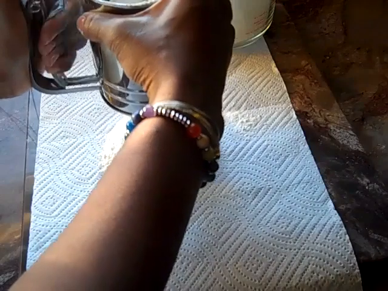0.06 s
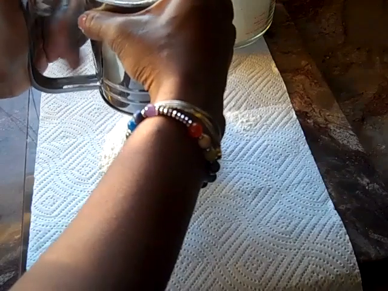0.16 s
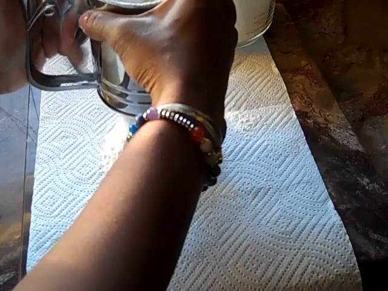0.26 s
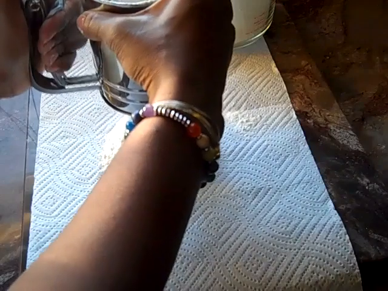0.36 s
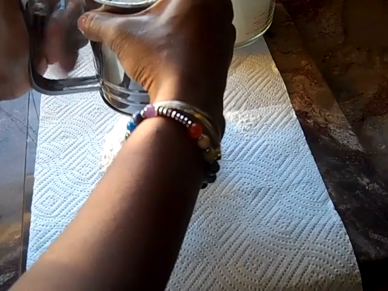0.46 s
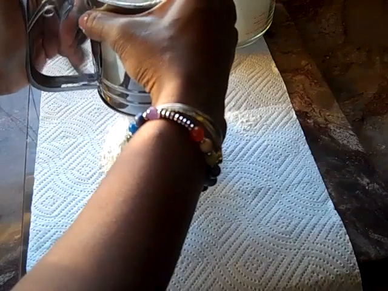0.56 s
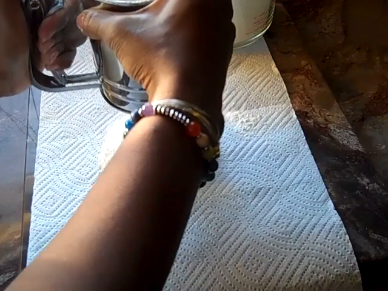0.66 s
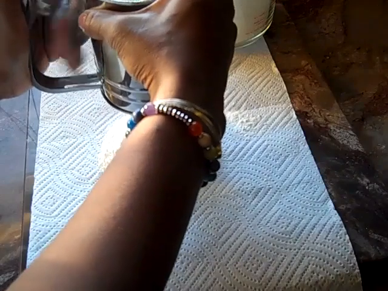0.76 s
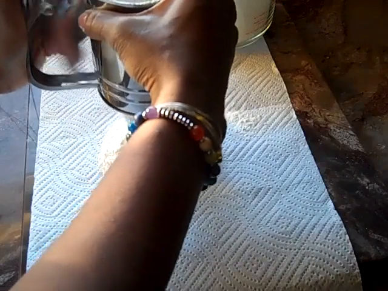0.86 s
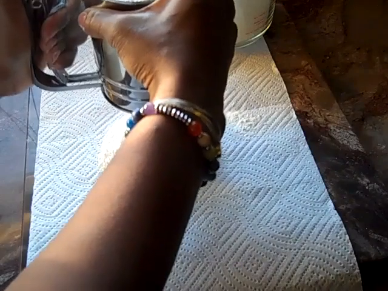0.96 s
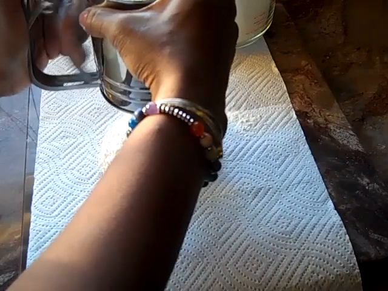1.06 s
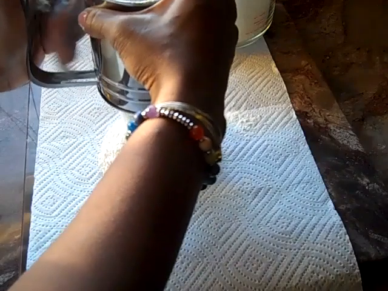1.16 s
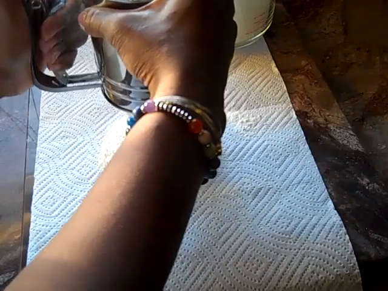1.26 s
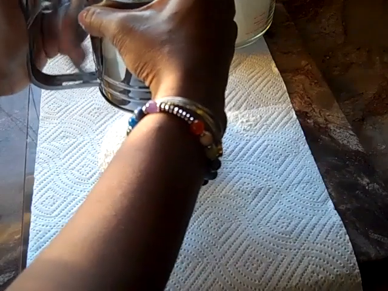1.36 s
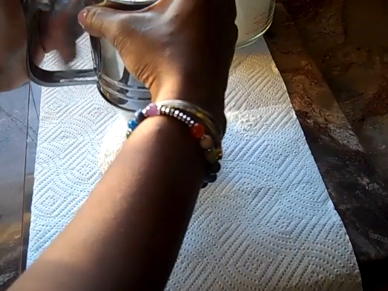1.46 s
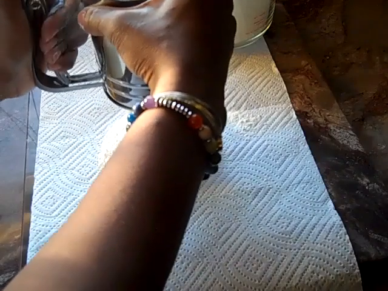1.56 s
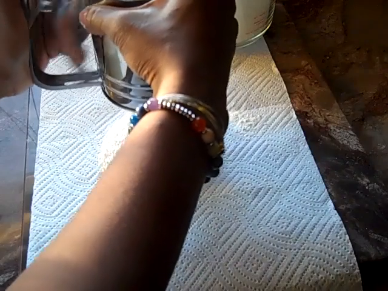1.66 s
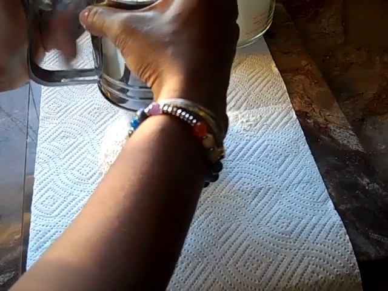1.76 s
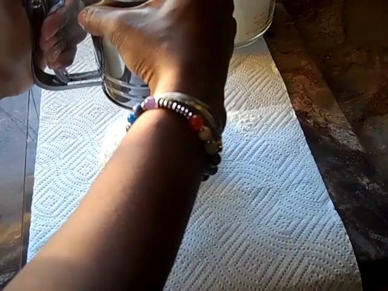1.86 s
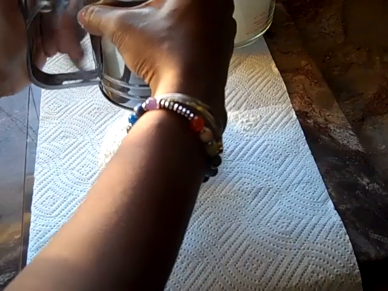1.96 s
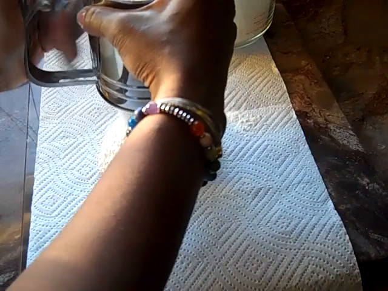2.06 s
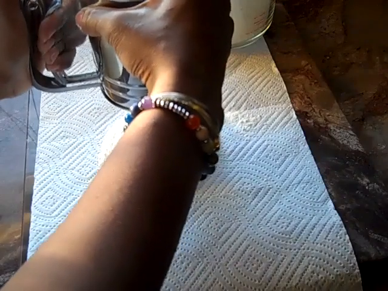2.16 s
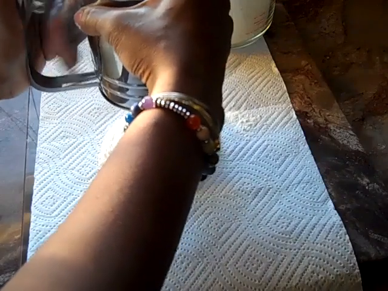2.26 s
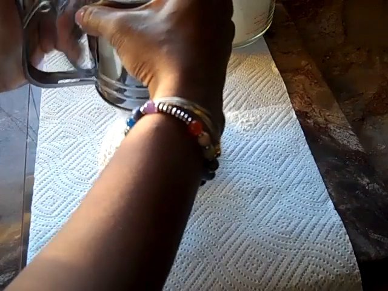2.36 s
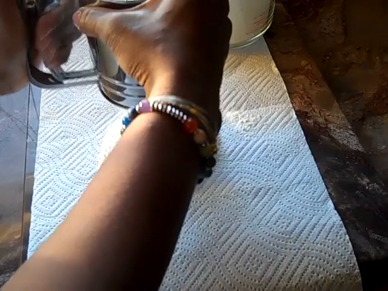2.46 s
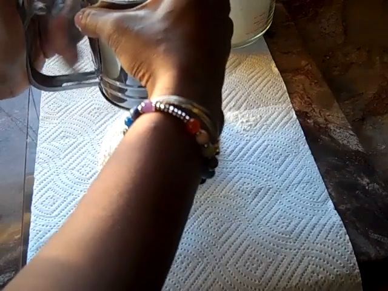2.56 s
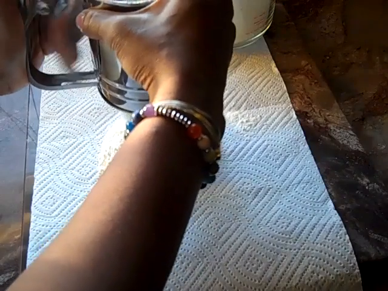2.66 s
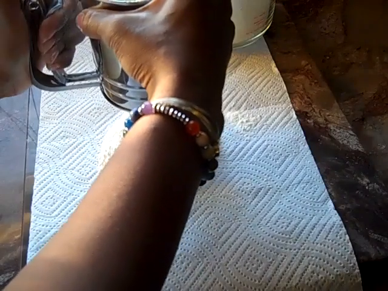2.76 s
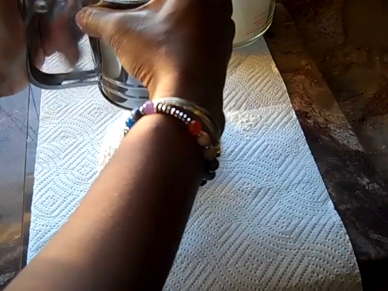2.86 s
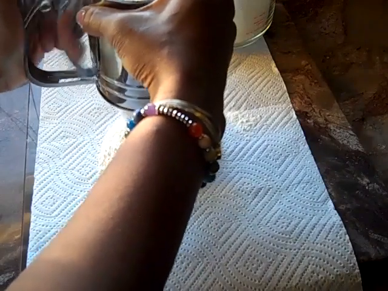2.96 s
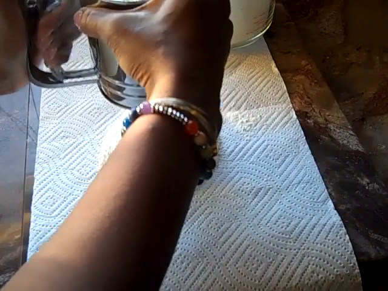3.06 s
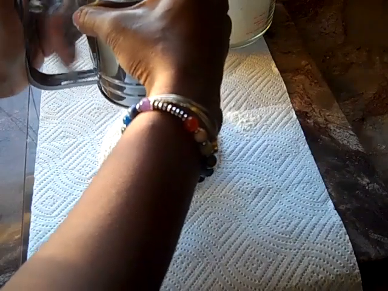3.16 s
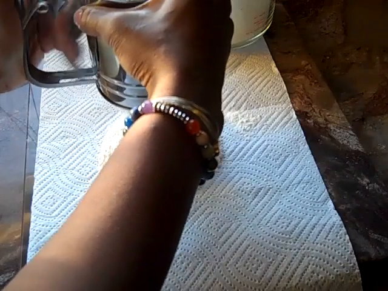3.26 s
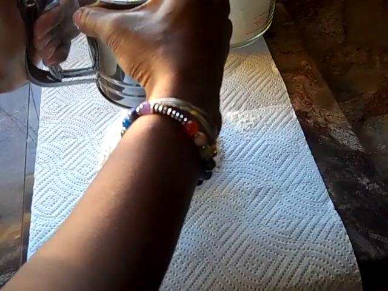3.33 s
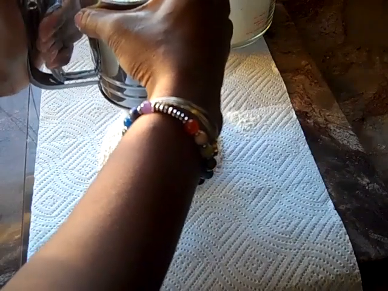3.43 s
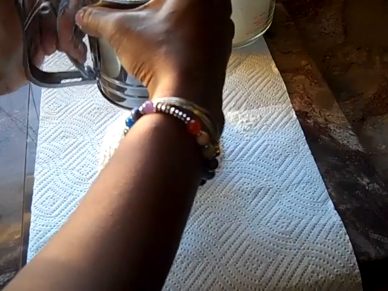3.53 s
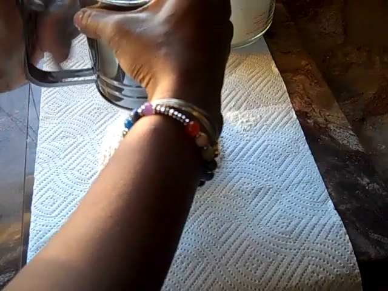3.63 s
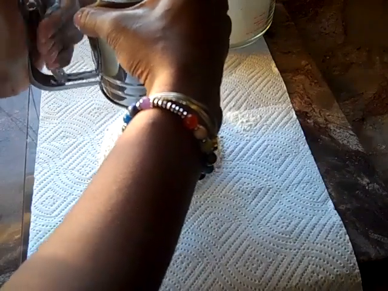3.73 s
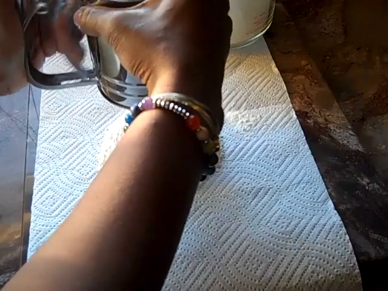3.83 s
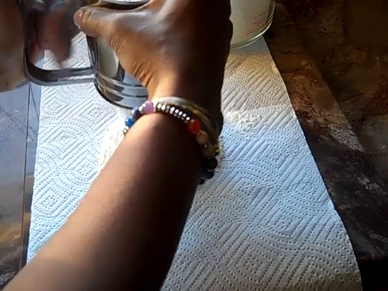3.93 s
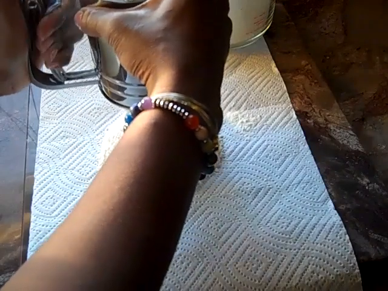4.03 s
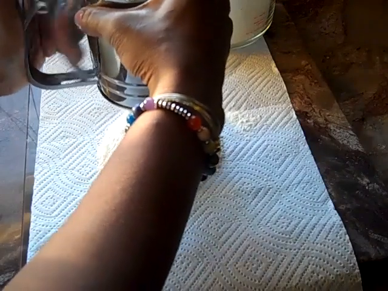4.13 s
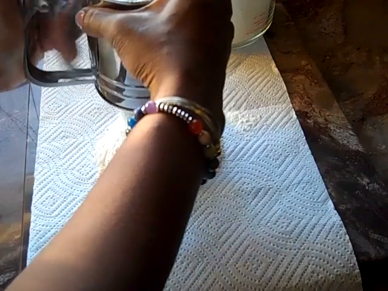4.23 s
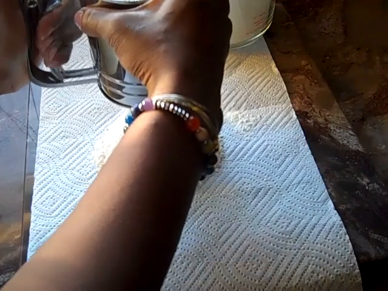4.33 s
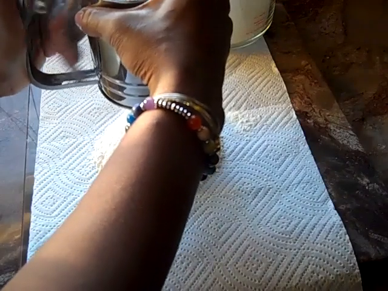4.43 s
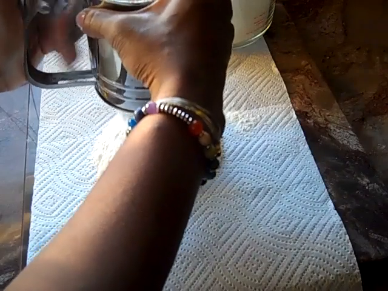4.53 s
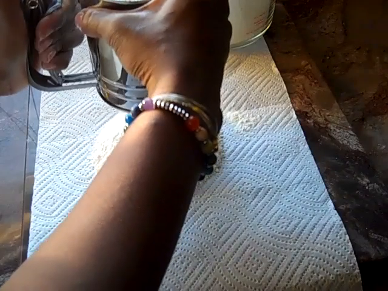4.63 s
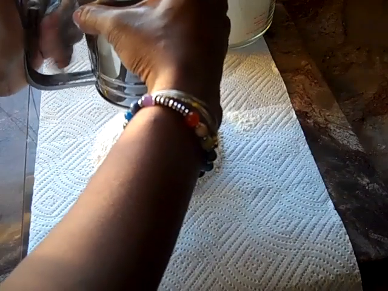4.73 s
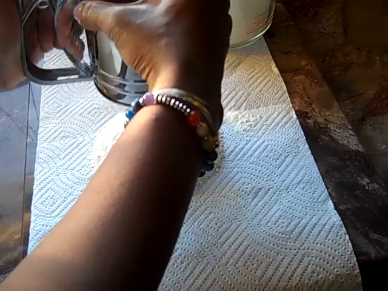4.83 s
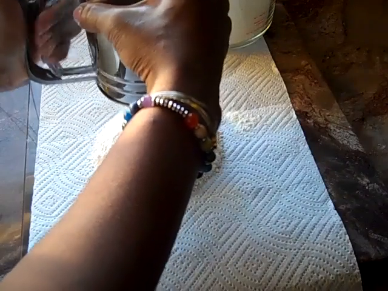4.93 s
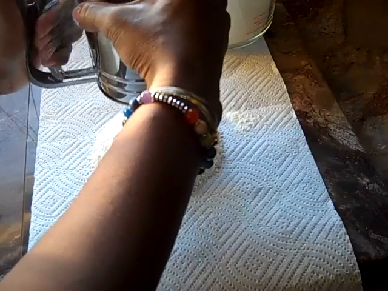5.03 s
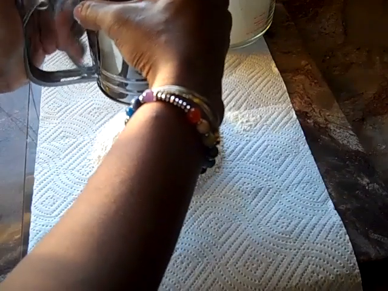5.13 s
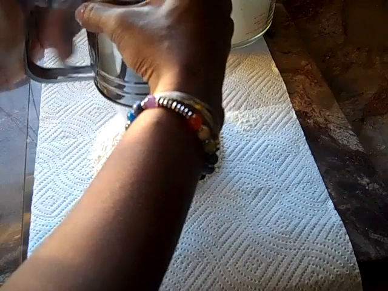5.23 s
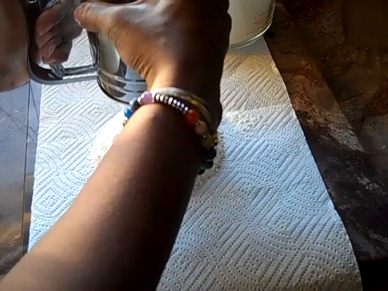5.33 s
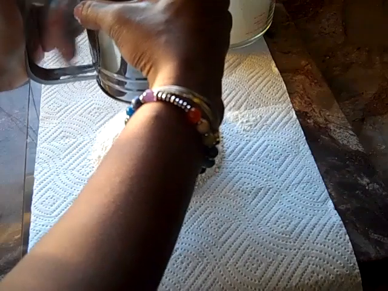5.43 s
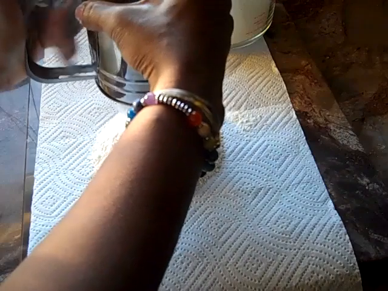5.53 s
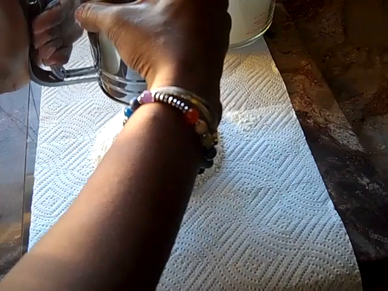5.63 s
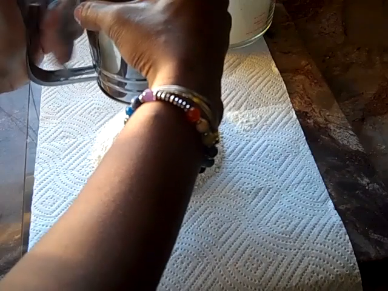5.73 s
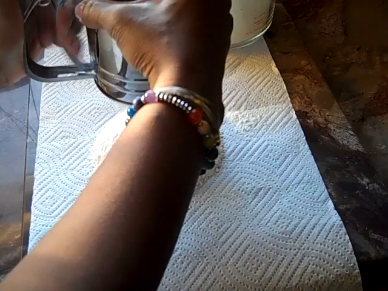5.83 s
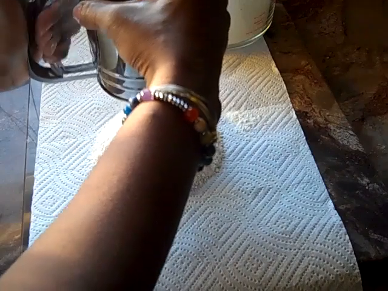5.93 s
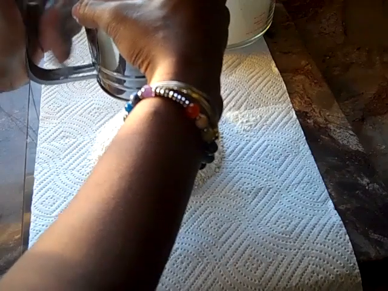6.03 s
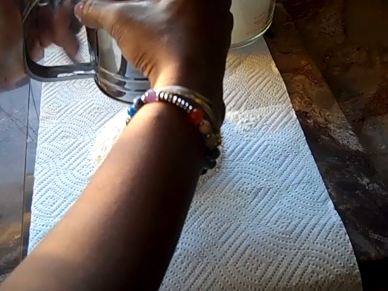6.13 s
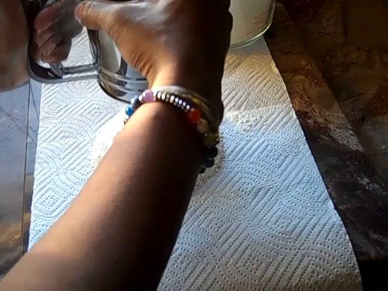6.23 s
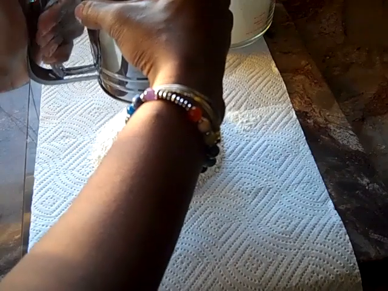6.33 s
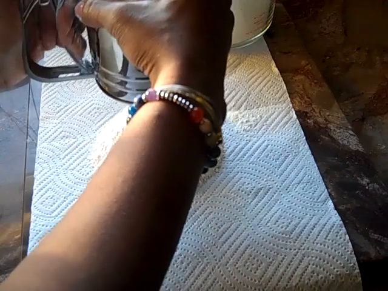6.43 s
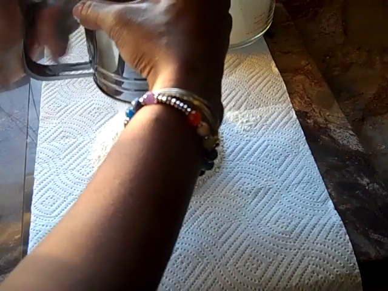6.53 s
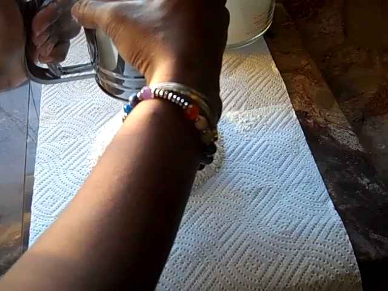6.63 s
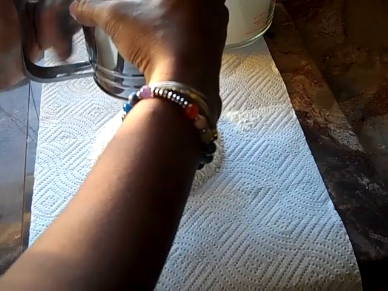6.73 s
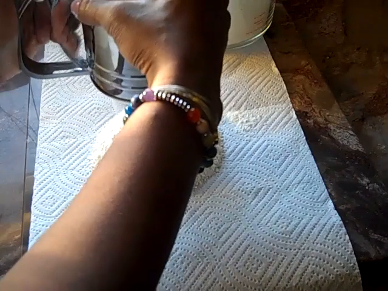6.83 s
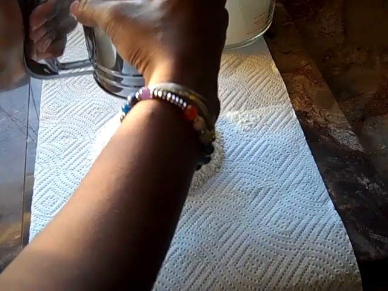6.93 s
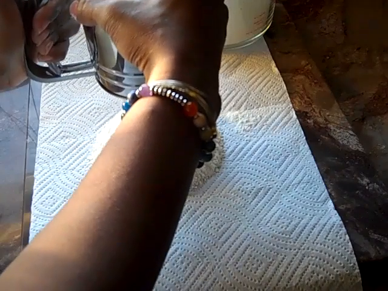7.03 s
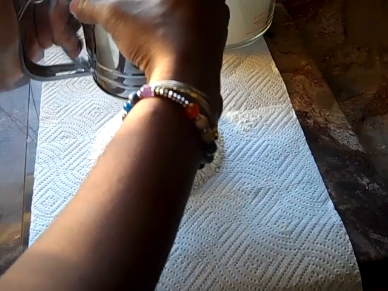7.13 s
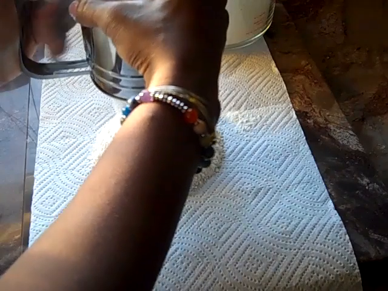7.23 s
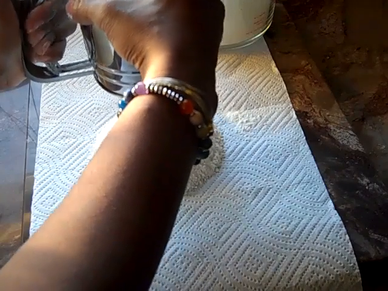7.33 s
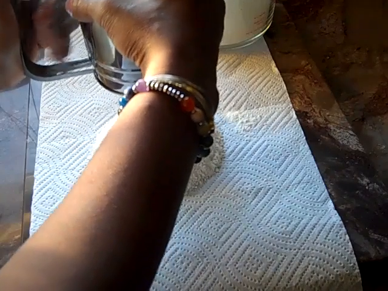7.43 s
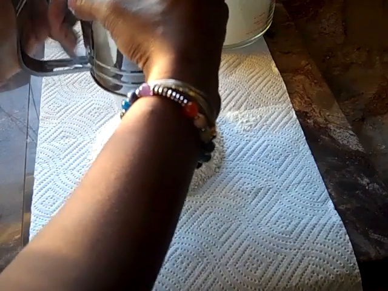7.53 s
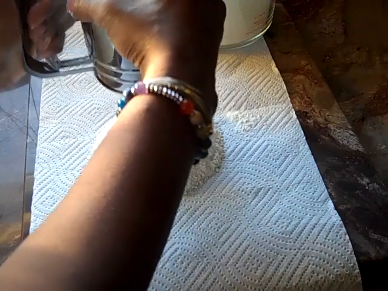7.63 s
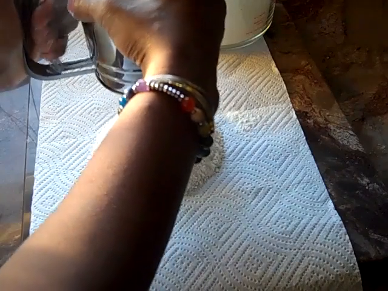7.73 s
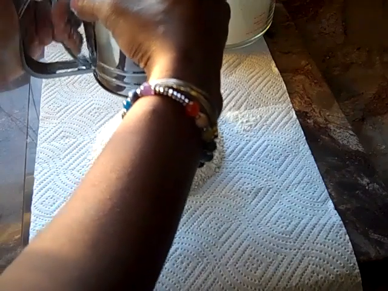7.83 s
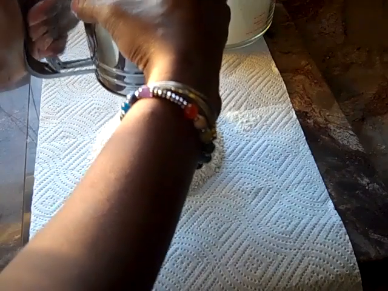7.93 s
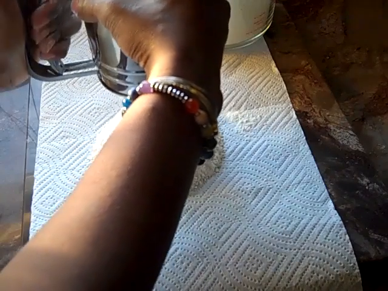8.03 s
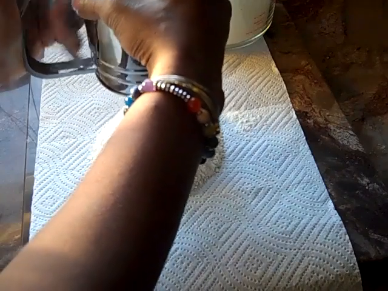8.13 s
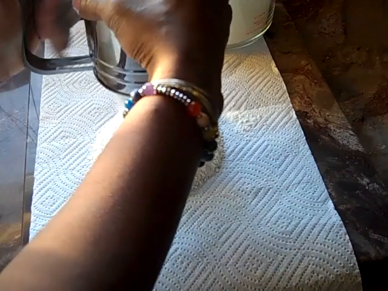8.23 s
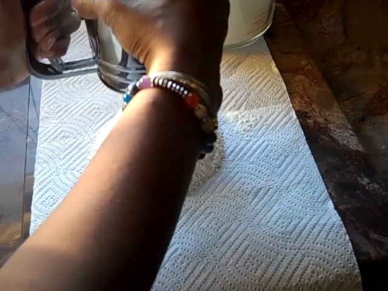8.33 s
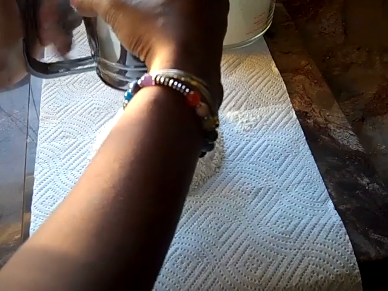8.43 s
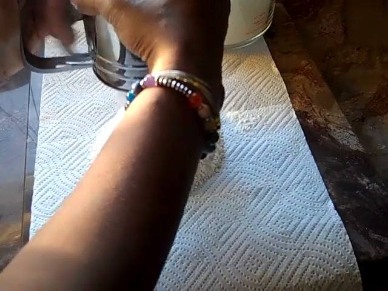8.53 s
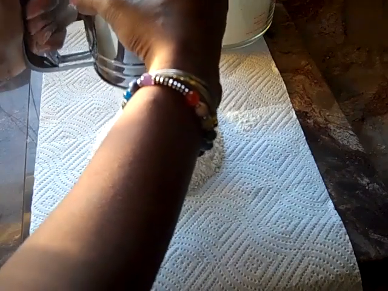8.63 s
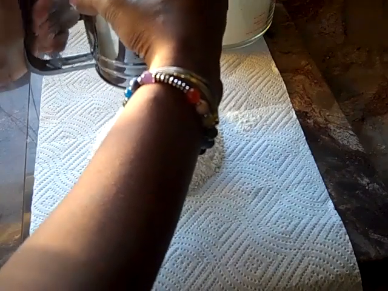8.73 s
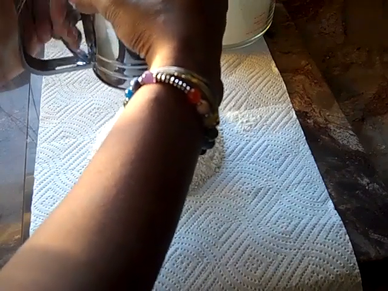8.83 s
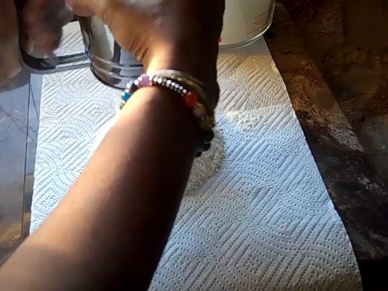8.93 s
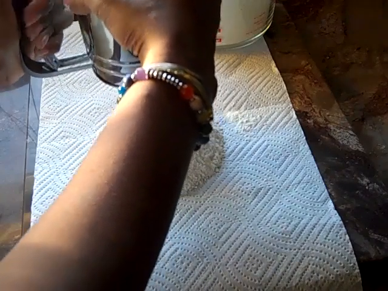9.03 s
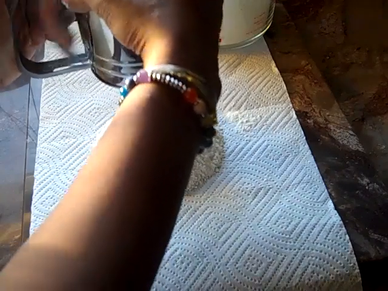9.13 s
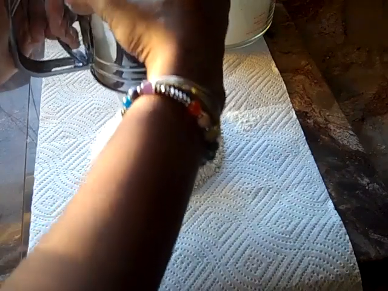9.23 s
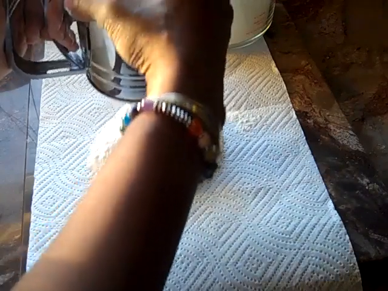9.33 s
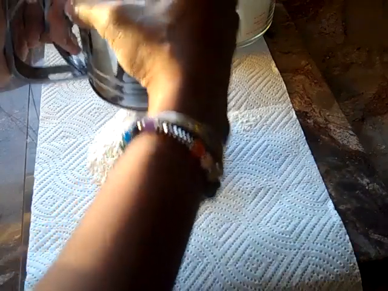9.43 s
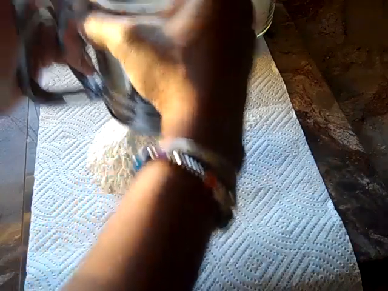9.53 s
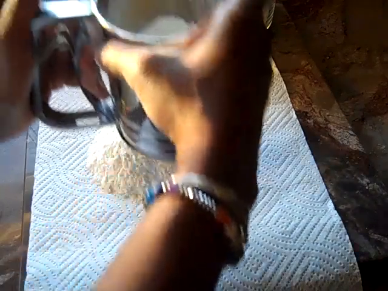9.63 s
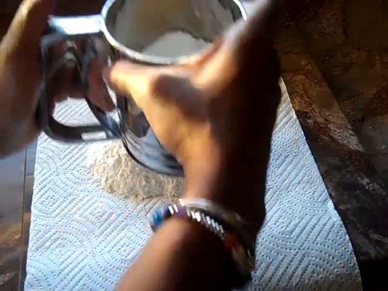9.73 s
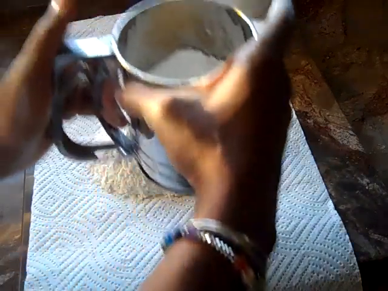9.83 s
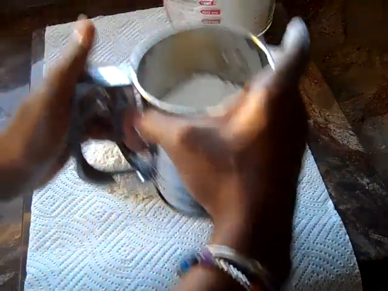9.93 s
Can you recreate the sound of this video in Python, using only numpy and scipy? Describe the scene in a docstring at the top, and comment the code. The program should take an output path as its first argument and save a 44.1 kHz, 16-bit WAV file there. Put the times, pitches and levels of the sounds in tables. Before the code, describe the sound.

From the very start, a thin metal flour sifter is squeezed at close range in a quiet kitchen, at roughly three full cycles per second. Each release gives a small tick, a gritty drag of wire across mesh and flour, and then a loud, bright, dry clack as the handle hits its stop. Each squeeze follows with a sharp tick, irregular little catches, a stronger swelling rasp and only a faint late knock. The can's ring is very short and damped; live room echoes trail each clack. The rhythm stays even from 0 to about 9.2 seconds, easing slightly slower after the first two seconds, with varying tick strengths and somewhat firmer clacks after about 5 seconds. The soft push of flour gradually weakens. The working stops around 9.3 seconds, leaving low house murmur, faint hiss and nearly inaudible metallic settling at about 9.7 to 9.8 seconds.

```python
"""Tin flour sifter in a quiet kitchen

A hand works the spring handle about three times a second, over a low murmur of the house. Each release and each
squeeze starts with a tick, drags the wire agitator over the mesh through the flour and has a knock late on,
mostly the handle's stop. Shaped noise makes the blows, grit and flour; resonators make the brief ring of the
can and of its wire. The room answers with sparse, decaying echoes, and two microphone ports colour the treble."""
import sys
import numpy as np
from scipy import signal
from scipy.io import wavfile
from scipy.ndimage import uniform_filter1d

SR = 44100
rng = np.random.default_rng(int(sys.argv[2]) if len(sys.argv) > 2 else 0)


def unload_wav(signal):
    """Save mono or channel-first audio to the path in sys.argv[1] as 16-bit WAV at rate SR, clipped to [-1, 1]."""
    wavfile.write(
        sys.argv[1],
        SR,
        np.round(np.clip(np.atleast_2d(signal).T, -1, 1) * 32767).astype(np.int16),
    )


N = 440118

# Kitchen air: (frequency [Hz], relative density [dB per Hz])
AIR_SPECTRUM = [(25, 18), (60, 9.5), (170, 7), (350, -0.5), (700, -3.5), (1300, -6), (2200, -9.5),
                (2800, -19), (5000, -24), (8000, -28), (14000, -45.5)]
# Likeness of the air at the left and right port: (frequency [Hz], correlation [-1 to 1])
AIR_LIKENESS = [(60, 0.74), (290, 0.88), (640, 0.78), (1400, 0.52), (3100, .12), (7000, .01)]
# Releases and squeezes in turn: (start time [s], first tick level [dB], drag of the wire [dB])
STROKES = [(0.0324, -23.5, -31), (0.216, -14.5, -34), (0.3422, -12, -31.5), (0.535, -13.5, -30.5),
           (0.645, -11.5, -28.5), (0.8176, -13.5, -29), (0.9408, -15, -30), (1.1005, -17.5, -32),
           (1.2066, -11, -29), (1.4, -13.5, -33.5), (1.5242, -21, -30.5), (1.7052, -16, -31),
           (1.8163, -8.5, -32), (1.9984, -16.5, -34.5), (2.123, -30, -30.5), (2.3177, -13, -34.5),
           (2.4472, -14.5, -33.5), (2.6091, -20, -35), (2.717, -35, -31.5), (2.905, -17, -34.5),
           (3.0473, -15.5, -34.5), (3.2134, -18, -36.5), (3.333, -21.5, -32.5), (3.5317, -16.5, -34.5),
           (3.668, -26.5, -31.5), (3.853, -15, -32.5), (3.9736, -22, -32.5), (4.162, -15.5, -34),
           (4.2892, -31, -31.5), (4.4708, -19, -32.5), (4.5938, -32, -34.5), (4.7965, -16.5, -35),
           (4.9514, -19, -28.5), (5.1489, -15.5, -32), (5.2911, -14.5, -32.5), (5.476, -19, -36),
           (5.5977, -13, -31), (5.7938, -14, -35), (5.9086, -7, -35), (6.0913, -18.5, -38.5),
           (6.2187, -16, -34), (6.4249, -15, -34), (6.5745, -13, -32), (6.776, -16, -36.5),
           (6.9282, -14, -28), (7.143, -15, -33.5), (7.279, -16, -34.5), (7.486, -18, -36.5),
           (7.622, -18, -34), (7.815, -15.5, -37), (7.9422, -14, -31.5), (8.148, -16.5, -35),
           (8.2769, -15, -31.5), (8.48, -18, -34), (8.606, -15.5, -35), (8.815, -17, -34.5),
           (8.9442, -29, -38.5), (9.1413, -16.5, -35)]
# The agitator catches on mesh and linkage: (time [s], level [dB])
CATCHES = [(0.0506, -20.5), (0.0821, -18), (0.2325, -15.5), (0.3557, -17), (0.3791, -24.5), (0.5473, -15.5),
           (0.5615, -17), (0.6775, -15.5), (0.8289, -19), (0.859, -20), (1.1297, -16.5), (1.2334, -18),
           (1.4163, -23), (1.4275, -18), (1.5477, -12.5), (1.8278, -13), (1.8518, -17), (2.1361, -20),
           (2.3285, -21), (2.4577, -17.5), (2.4644, -15.5), (2.7303, -15), (2.7535, -38), (2.7612, -37),
           (3.0573, -16), (3.067, -22.5), (3.3529, -20), (3.3763, -29), (3.8939, -37), (3.9854, -18),
           (4.3042, -20), (4.3254, -25), (4.4938, -19.5), (4.6025, -17), (4.627, -34), (4.819, -15.5),
           (5.163, -20), (5.169, -12.5), (5.283, -40), (5.3005, -23.5), (5.3204, -23.5), (5.4888, -18.5),
           (5.5202, -23.5), (5.8163, -23), (5.9532, -18.5), (6.1044, -18), (6.4456, -18.5), (6.7985, -12),
           (6.8242, -26), (6.9589, -21), (7.162, -16.5), (7.1859, -25), (7.2894, -24), (7.3114, -18.5),
           (7.3276, -19.5), (7.5079, -12), (7.6491, -20.5), (7.8354, -11.5), (7.9509, -30), (7.9764, -18.5),
           (8.169, -17), (8.2839, -38.5), (8.3059, -22), (8.5022, -14), (8.6157, -17.5), (8.6444, -17),
           (8.8384, -10.5), (8.9556, -16), (8.9714, -29), (8.9908, -17.5), (9.0138, -16), (9.168, -16)]
# Knock late in each stroke, mostly the handle's stop, sometimes a catch: (time [s], level [dB])
LATE_KNOCKS = [(0.1035, -8.5), (0.273, -39), (0.407, -8.5), (0.581, -37), (0.7086, -7.5), (0.8765, -36),
               (0.992, -10.5), (1.1585, -31), (1.2746, -8), (1.45, -24.5), (1.5827, -9), (1.7708, -28),
               (1.8837, -8), (2.061, -29), (2.1919, -8), (2.383, -31), (2.5131, -12), (2.6794, -25.5),
               (2.7891, -9.5), (2.9742, -21.5), (3.1196, -11), (3.2838, -24.5), (3.4025, -7.5),
               (3.597, -20), (3.7309, -7), (3.912, -21), (4.04, -7), (4.232, -29), (4.3636, -10),
               (4.515, -36), (4.6604, -7), (4.8674, -22), (5.0042, -6), (5.2215, -20), (5.3449, -7),
               (5.547, -23), (5.6507, -4.5), (5.867, -23), (5.986, -8.5), (6.165, -26), (6.2802, -7.5),
               (6.5005, -24), (6.6315, -7), (6.847, -23), (6.9818, -5), (7.215, -32), (7.3349, -5.5),
               (7.5605, -19), (7.683, -7.5), (7.8942, -21), (8.0007, -6.5), (8.2288, -25.5), (8.337, -5.5),
               (8.5272, -21), (8.6668, -5.5), (8.8597, -20), (9.0201, -4.5), (9.2374, -22.5)]
# The sifter tilts: (time [s], level [dB], blunt part relative to that level [dB])
SETTLING = [(9.715, -51, -31), (9.739, -54.5, -30), (9.828, -68, 20)]
# Modes of the can, damped by hand and flour, with the ring of the agitator wire as the top row: (frequency
# [Hz], level [dB], t60 [s])
CAN_MODES = [(180.3, 0, 0.06), (338, 2.5, 0.028), (653, -8, 0.073), (1130, -6.5, 0.022), (1481, -2, 0.0089),
             (2430, -0.5, 0.011), (4490, -17, 0.01), (5150, 1, .015), (10550, -9, .03)]
# Decay of the far echoes: (frequency [Hz], t60 [s])
ROOM_DECAY = [(250, 0.53), (1500, 0.49), (5000, 0.47), (10000, 0.32), (13500, 0.16)]
# Colour of the microphone ports: (frequency [Hz], left gain [dB], right gain [dB])
PORTS = [(30.6, -16.5, -11), (267, -1.5, -1), (4810, -4.5, -6), (5980, -5, 2), (7025, 9.5, 6),
         (7820, 11.5, 0), (8500, 7, -6.5), (9200, 0.5, -10.5), (11320, 0, -10), (13230, -2, -21),
         (15200, -27.5, -39), (17000, -40, -28.5)]

AIR_DB = -51.5  # rms level of the murmur

# Blows: snap is the bright first contact of metal on metal, crack the sharp body, thud the blunt part
SNAP_DB, SNAP_T60, SNAP_HZ = 14, 0.0015, 10140
SNAP_GROWTH = 2  # a hard blow is also a brighter one: dB of snap for each dB of blow
CRACK_RISE_S, CRACK_T60, THUD_T60 = 0.00036, 0.01, 0.014
THUD_HZ = (330, 3480)  # band edges
TICK_BLUNT_DB, KNOCK_BLUNT_DB = -26, -13  # relative to the blow: the first tick is thin, the knock has weight
CATCH_BLUNT_DB = (-37.5, -6.5)  # relative to the catch: wire at rest, wire at full speed
SMALL_CATCHES = 2  # extra catches in every stroke, at chance places
SMALL_DB, SMALL_SPREAD_DB = -30, 1

# Pairs below are (release, squeeze)
PUSH_AT_S, PUSH_WIDTH_S = (0.04, 0.042), (0.022, 0.017)  # the wire is fastest and the flour resists most
SPEED_DB = (4, 12.5)  # rise of the scrape from rest to full speed
FADE_DB = (-2.5, -9.5)  # change of the scrape from start to late knock
RUNOUT_T60 = (0.03, 0.24)  # [s] the wire slides on a little after the late knock
PUSH_DB = (-37.5, -35.5)  # drive of the flour's push at full speed, before spread and sag
PUSH_SPREAD_DB = 1.5  # the flour lies differently at each stroke
PUSH_SAG_DB_PER_S = -0.3064  # the can empties
GRAINS_PER_S, GRAIN_SPREAD_DB = 1700, 4.3
CLUMP_DB = 2.4  # rms swing of the uneven drag

# Cracks and scrape are kept above SHARP_HZ, grit softens above GRIT_HZ, the push lies within BLUNT_HZ
SHARP_HZ, GRIT_HZ, BLUNT_HZ = 3190, 7700, (159, 2570)
# Above this frequency the ports partly face different sides of the can; then the shares of difference
APART_HZ, APART, BLUNT_APART = 4800, 0.36, 0.079
SPOT_DB, SPOT_S = 2.8, 0.02  # spread and step of the wandering struck spot

ROOM_DB, NEAR_DB, NEAR_T60 = -14.5, -6.5, 0.04  # far walls; counter top and splash-back, t60 [s]
HISS_DB, HISS_HZ = -71.5, 14200  # faint hiss that ends near 14 kHz: rms before its low-pass, cutoff
EDGE_HZ = 16750  # upper band limit


def gain_of(db):
    """Amplitude factor for a level in dB."""
    return 10 ** (np.asarray(db) / 20)


def evened(x):
    """Scale to an rms of one."""
    return x / np.sqrt(np.mean(x ** 2) + 1e-20)


def read(hz_points, values, hz):
    """Read a curve between its points along a logarithmic frequency axis."""
    return np.interp(np.log(hz + 1), np.log(np.asarray(hz_points) + 1), values)


def add(mix, s, sound):
    """Lay a sound into the mix at s seconds, cut at the end of the mix."""
    part = mix[max(round(s * SR), 0):][:len(sound)]
    part += sound[:len(part)]


def edge(x, hz, kind, order=2):
    """Butterworth low, high or band filter."""
    return signal.sosfilt(signal.butter(order, hz, kind, fs=SR, output="sos"), x)


def air():
    """Low murmur of the house: random short-time spectra with drifting patches."""
    frames, hz = N // 256 + 5, np.fft.rfftfreq(1024, 1 / SR)
    a, b, c, d, patches = rng.standard_normal((frames, 513, 5)).T
    patches = uniform_filter1d(patches, 6, 0)  # smooth over frequency
    patches_db = evened(uniform_filter1d(patches, 20, 1))  # smooth over time
    same = np.clip(read(*np.transpose(AIR_LIKENESS), hz), -1, 1)[:, None]
    left = a + 1j * b
    right = same * left + np.sqrt(1 - same ** 2) * (c + 1j * d)
    density_db = read(*np.transpose(AIR_SPECTRUM), hz)[:, None]
    spectra = np.array([left, right]) * gain_of(density_db + patches_db)
    murmur = signal.istft(spectra, nperseg=1024, noverlap=768)[1][:, :N]
    return gain_of(AIR_DB) * evened(murmur)


def speed_of(k, t):
    """Speed of the wire, 0-1, t seconds into stroke k: a bell curve."""
    return np.exp(-.5 * ((t - PUSH_AT_S[k % 2]) / PUSH_WIDTH_S[k % 2]) ** 2)


def catches():
    """Placed and chance catches; the faster the wire, the more weight a catch has."""
    starts, knocks = np.array(STROKES)[:, 0], np.array(LATE_KNOCKS)[:, 0]
    place = rng.random((len(starts), SMALL_CATCHES))
    size = rng.standard_normal(place.shape)
    small_s = starts[:, None] + (knocks - starts)[:, None] * (.1 + .8 * place)
    small_db = SMALL_DB + SMALL_SPREAD_DB * size
    rest_db, fast_db = CATCH_BLUNT_DB
    rows = []
    for s, db in list(CATCHES) + list(zip(small_s.ravel(), small_db.ravel())):
        k = np.searchsorted(starts, s) - 1  # the latest stroke begun
        rows.append((s, db, rest_db + (fast_db - rest_db) * speed_of(k, s - starts[k])))
    return rows


def blows():
    """Every tick, catch, late knock and settling blow: (time [s], level [dB], relative blunt part [dB])."""
    ticks = [(s, db, TICK_BLUNT_DB) for s, db, _ in STROKES]
    knocks = [(s, db, KNOCK_BLUNT_DB) for s, db in LATE_KNOCKS]
    return ticks + catches() + knocks + list(SETTLING)


def blow_envelopes():
    """Snap, crack and thud of every blow: snap starts at once, the others swell briefly, all die away."""
    snap, crack, thud = np.zeros((3, N))
    t = np.arange(1500) / SR
    rise = 1 - np.exp(-(t / CRACK_RISE_S) ** 2)
    for s, db, blunt_db in blows():
        add(snap, s, gain_of(SNAP_GROWTH * db + SNAP_DB - 60 * t / SNAP_T60))
        add(crack, s, gain_of(db - 60 * t / CRACK_T60) * rise)
        add(thud, s, gain_of(db + blunt_db - 60 * t / THUD_T60) * rise)
    return snap, crack, thud


def drag_envelopes():
    """Scrape of the wire and push of the flour: both swell with the wire's speed in each stroke."""
    scrape, push = np.zeros((2, N))
    t = np.arange(8000) / SR
    lie = rng.standard_normal(len(STROKES))
    for k, ((s, _, drag_db), (knock, _)) in enumerate(zip(STROKES, LATE_KNOCKS)):
        way = k % 2  # 0 release, 1 squeeze
        along = np.minimum(t / (knock - s), 1)
        speed = speed_of(k, t)
        scrape_db = drag_db + FADE_DB[way] * (along - .5) + SPEED_DB[way] * (speed - .5)
        runout_db = -60 * np.maximum(t - (knock - s), 0) / RUNOUT_T60[way]
        add(scrape, s, gain_of(scrape_db + runout_db) * np.minimum(t / .005, 1))  # 5 ms fade-in
        push_db = PUSH_DB[way] + PUSH_SAG_DB_PER_S * s + PUSH_SPREAD_DB * lie[k]
        add(push, s, gain_of(push_db) * speed)
    return scrape, push


def mesh_grit():
    """Chance slips over the mesh wires, each a decay of about a millisecond, in slowly varying clumps."""
    clumps = gain_of(CLUMP_DB * evened(edge(rng.standard_normal(N), 160, "low")))  # the wire drags unevenly
    sizes = gain_of(GRAIN_SPREAD_DB * np.minimum(rng.exponential(1, N), 4))
    slips = rng.random(N) < GRAINS_PER_S / SR
    return evened(signal.lfilter([1], [1, -.96], clumps * sizes * slips))


def agitator():
    """The force on the can: snap, crack and thud a blow, grit and a push of flour a stroke."""
    snap, crack, thud = blow_envelopes()
    scrape, push = drag_envelopes()
    grit = mesh_grit()
    # two rows towards the ports, three towards the room: every side of the can sounds its own detail
    sharp, blunt = rng.standard_normal((2, 5, N))
    sharp[1] = sharp[0] + APART * edge(sharp[1] - sharp[0], APART_HZ, "high")
    blunt[1] = blunt[0] + BLUNT_APART * (blunt[1] - blunt[0])
    blunt = evened(edge(blunt, BLUNT_HZ, "band"))
    snaps = edge(snap * sharp[[0, 0, 2, 3, 4]], SNAP_HZ, "high", order=4)  # alike at both ports
    treble = crack * sharp + edge(grit * scrape * sharp, GRIT_HZ, "low", order=1)
    cracks_and_grit = edge(treble, SHARP_HZ, "high", order=4)
    thuds = edge(thud * blunt, THUD_HZ, "band")
    pushes = edge(push * np.sqrt(grit) * blunt, BLUNT_HZ, "band")
    return snaps + cracks_and_grit + thuds + pushes


def can(force):
    """The blow itself plus the modes that it rings, in shares that wander with the struck spot."""
    steps = np.arange(0, N / SR + SPOT_S, SPOT_S)
    shares_db = SPOT_DB * rng.standard_normal((len(steps), len(CAN_MODES)))
    ring = np.zeros(N)
    for (hz, db, t60), share_db in zip(CAN_MODES, shares_db.T):
        r = 10 ** (-3 / (t60 * SR))  # decay per sample
        turn = 2 * np.pi * hz / SR  # phase per sample
        drive = force[0] * np.interp(np.arange(N) / SR, steps, gain_of(db + share_db))
        ring += signal.lfilter([(1 - r * r) * np.sin(turn)], [1, -2 * r * np.cos(turn), r * r], drive)
    return force - ring  # opposite in sign below each mode, which leaves a dip there


def tail(t60, start):
    """Sparse taps of random sign, other ones for each ear, every band dying at its own speed."""
    taps = np.zeros((2, SR // 2))
    at = np.arange(start, SR // 2 - 20, 20)
    at = at + rng.integers(0, 20, (2, len(at)))  # one tap in every 20 samples
    np.put_along_axis(taps, at, rng.choice([-1., 1.], at.shape), 1)
    right = taps[0] + edge(taps[1] - taps[0], 2600, "high")  # bass is alike at both ports
    hz, t, spectra = signal.stft(np.array([taps[0], right]), SR, nperseg=128)
    decay = gain_of(-60 * t / t60(hz)[:, None])
    out = signal.istft(spectra * decay, SR, nperseg=128)[1]
    return out / np.linalg.norm(out[0])


def kitchen(x):
    """Close surfaces answer at once and briefly, the walls later; each side of the can has its own echoes."""
    out = x[:2].copy()
    for side in x[2:]:
        near = gain_of(NEAR_DB) * tail(lambda hz: NEAR_T60 + 0 * hz, start=60)
        far = gain_of(ROOM_DB) * tail(lambda hz: read(*np.transpose(ROOM_DECAY), hz), start=300)
        out += signal.oaconvolve(side[None], near + far, axes=1)[:, :N] / np.sqrt(len(x) - 2)
    return out


def scene():
    """Murmur of the house under the sifter heard in the kitchen."""
    return air() + kitchen(can(agitator()))


def record(dry):
    """Each port is a causal filter with its own treble resonance; then hiss, clipping and the band limit."""
    points, *sides = np.transpose(PORTS)
    hz = abs(np.fft.fftfreq(4096, 1 / SR))
    log_gain = np.log(gain_of([read(points, db, hz) for db in sides]))
    spectra = np.exp(np.conj(signal.hilbert(log_gain, axis=1)))  # minimum phase
    ports = np.fft.ifft(spectra, axis=1).real[:, :2048]
    heard = signal.oaconvolve(dry, ports, axes=1)[:, :N]
    hiss = gain_of(HISS_DB) * edge(rng.standard_normal(heard.shape), HISS_HZ, "low", order=12)
    heard = np.clip(heard + hiss, -.93, .93)  # flattens the highest peaks
    band_limit = signal.firwin(511, EDGE_HZ, window=("kaiser", 9), fs=SR)
    return signal.oaconvolve(heard, band_limit[None], "same")


dry = scene()
out = record(dry)
unload_wav(out)
```